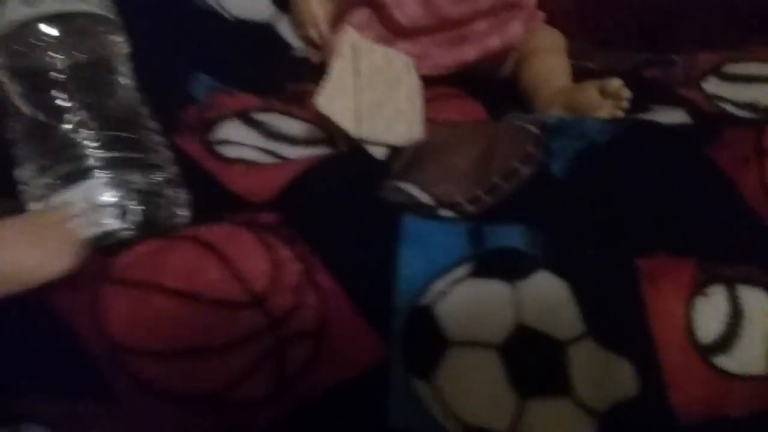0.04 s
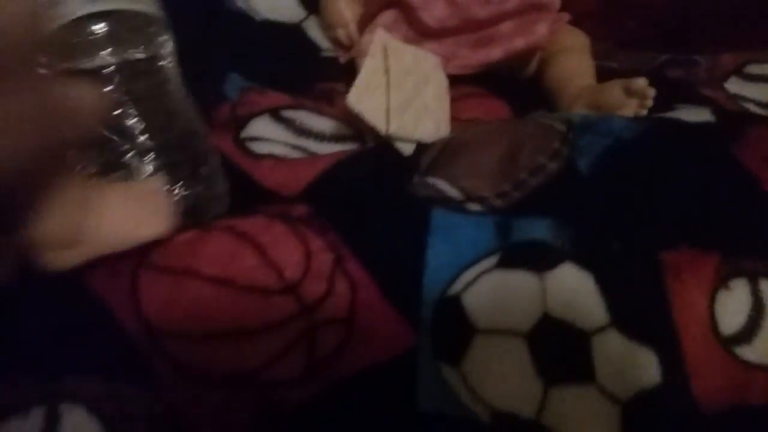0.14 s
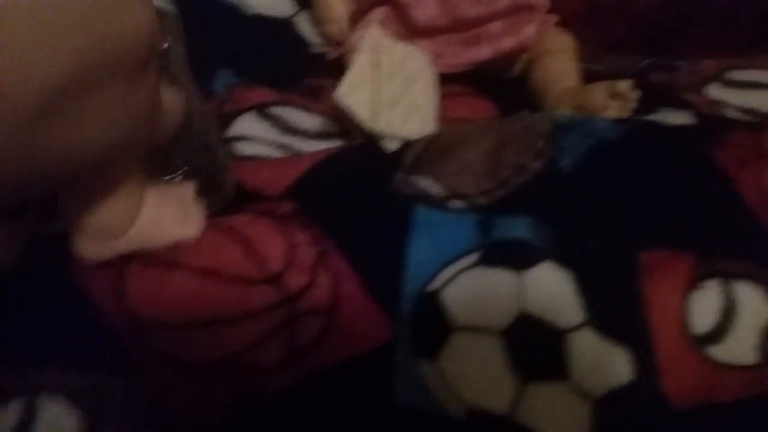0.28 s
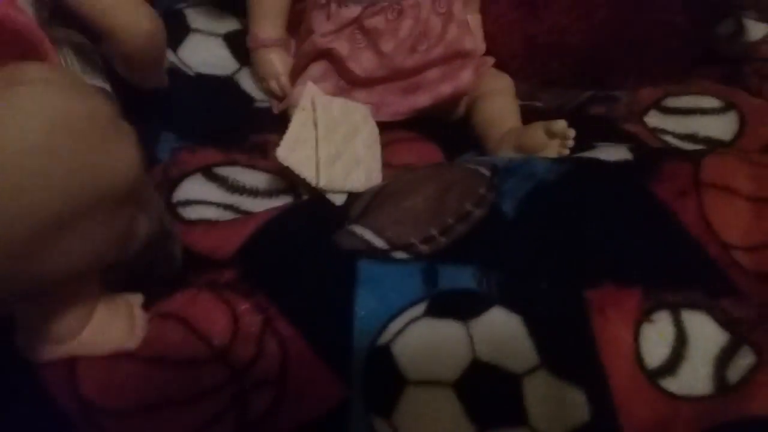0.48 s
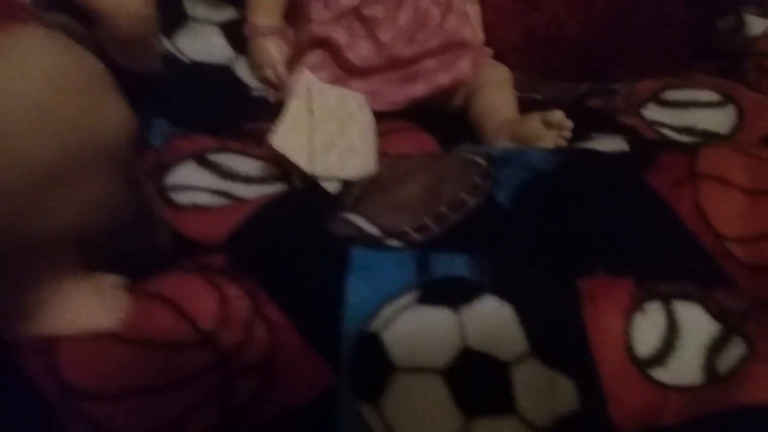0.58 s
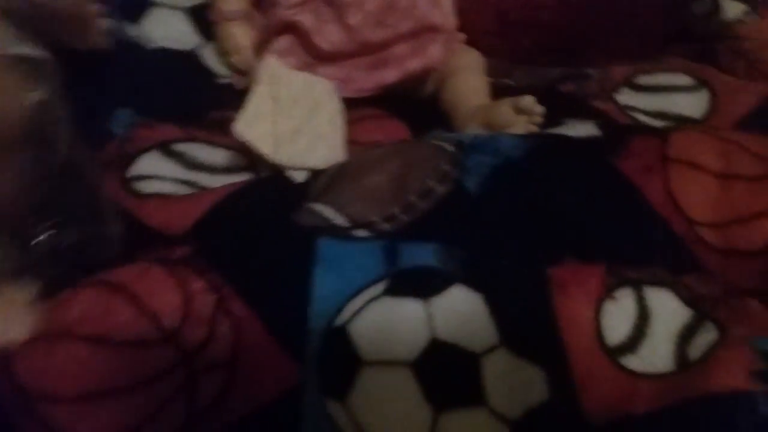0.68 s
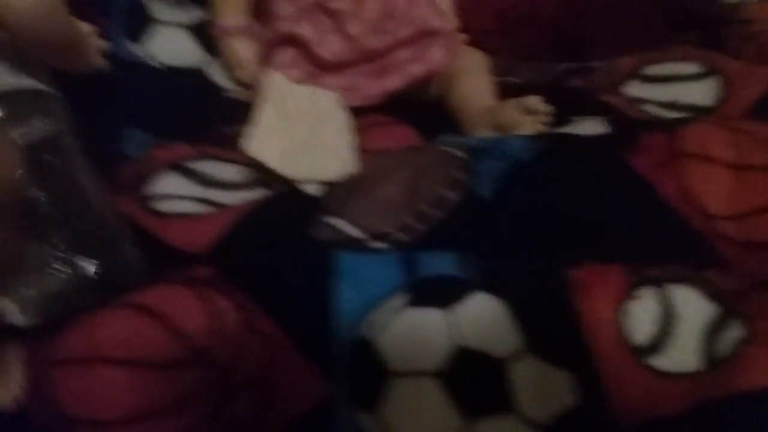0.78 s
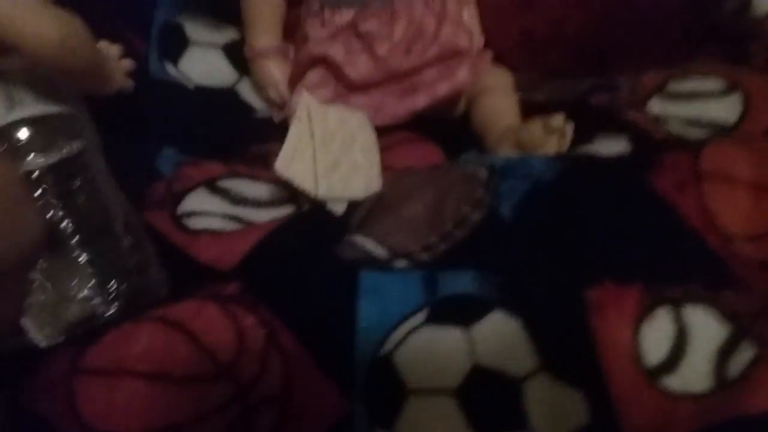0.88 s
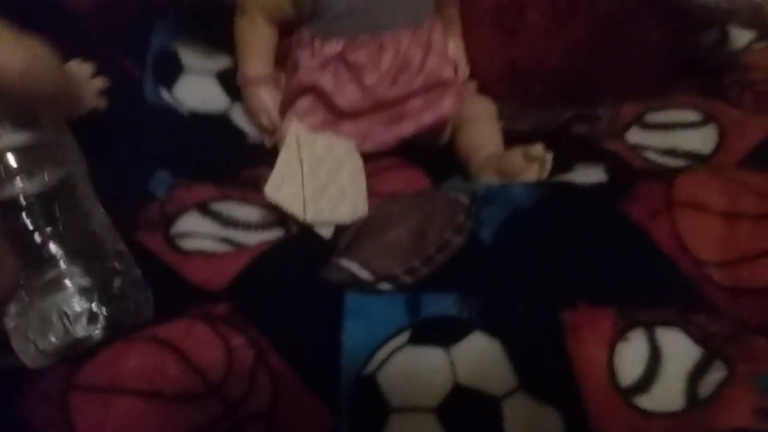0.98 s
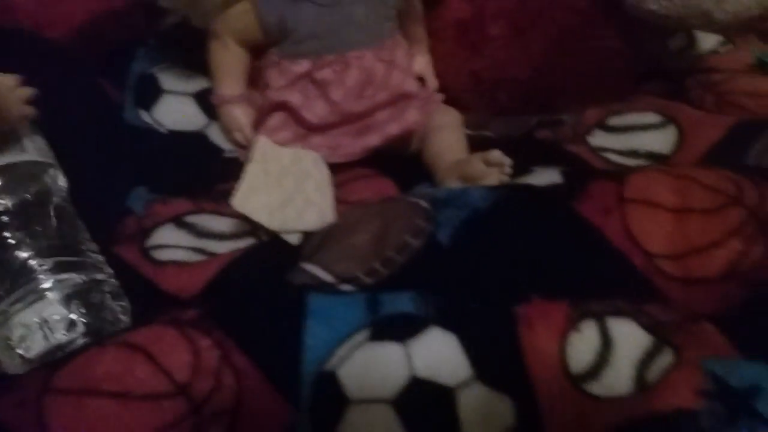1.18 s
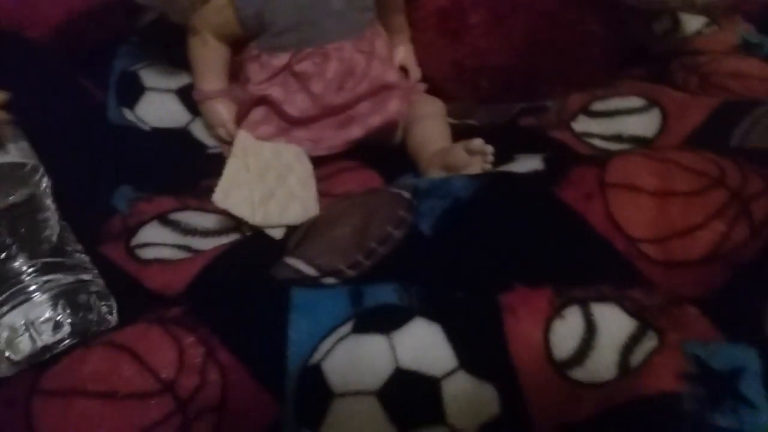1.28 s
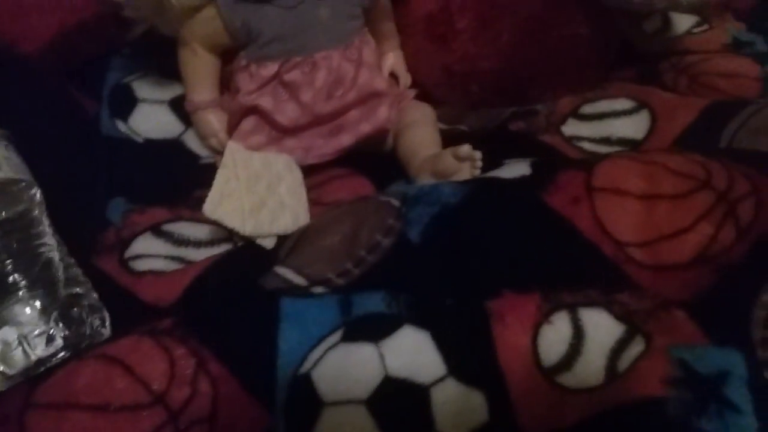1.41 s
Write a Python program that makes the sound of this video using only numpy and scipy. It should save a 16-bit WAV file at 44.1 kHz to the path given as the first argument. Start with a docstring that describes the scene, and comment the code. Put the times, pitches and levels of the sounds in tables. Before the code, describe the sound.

A thin plastic bottle is squeezed close to a phone microphone: faint brushing and small ticks, one loud snap, a short gap, then a tight burst of loud crackles, fading into quiet rumble in a small soft room.

```python
"""Squeezed plastic bottle

A thin plastic water bottle is squeezed close to a phone in a small soft room.
Dents snap over: runs of tiny random cracks ring damped wall modes, with a bright tick on top.
Each snap feeds a noise tail with early echoes; decaying sines make dull knocks.
Shaped noise makes the hand's brushing, the handling rumble and the faint room air."""
import sys
import numpy as np
from scipy import signal
from scipy.fft import rfft, irfft
from scipy.io import wavfile
from scipy.ndimage import uniform_filter1d

SR = 44100
rng = np.random.default_rng(int(sys.argv[2]) if len(sys.argv) > 2 else 0)


def wrap_up_sound(samples):
    """Save the sound to the file named by the first command line argument, as 16-bit audio."""
    columns = np.atleast_2d(samples).T
    # keep every value between -1 and 1, then stretch to whole-number steps
    tamed = np.clip(columns, -1, 1)
    steps = np.round(tamed * 32767).astype(np.int16)
    wavfile.write(sys.argv[1], SR, steps)


def ratio(d):
    """dB to gain"""
    e = np.asarray(d, float) / 20
    return 10 ** e


N = 63945

# hand brushing the plastic, before its flutter [t/s, level/dB]
BRUSH_LEVEL = [(0, -57.5), (.045, -56.5), (.1, -64.5), (.125, -52.5), (.15, -67), (.2, -84), (.23, -73.5),
               (.65, -94.5), (.72, -104.5), (.76, -77.5), (.8, -101.5), (.95, -70.5), (1.04, -68.5),
               (1.1, -63.5), (1.115, -76.5), (1.3, -78.5), (1.45, -72.5)]
# relative spectrum of the first brushing [f/Hz, level/dB]
BRUSH_COLOUR = [(880, -36.5), (1500, -3), (1930, -18.5), (2080, -12.5), (2920, -2), (3890, -20.5),
                (5470, 4.5), (6780, -2.5), (7700, -21), (10000, -25), (13000, -44.5), (22000, -120)]
# relative spectrum of the later, lighter brushing [f/Hz, level/dB]
SLIDE_COLOUR = [(880, -36), (1500, -13), (1980, -4), (3740, -9.5), (4740, -0.5), (6410, -12), (8460, -20.5),
                (10000, -21), (13000, -51.5), (22000, -120)]
# handling rumble, before swell and flutter [t/s, level/dB]
RUMBLE_LEVEL = [(0, -68.5), (.045, -59), (.1, -65), (.125, -56), (.15, -63.5), (.18, -61.5), (.225, -59),
                (.255, -52), (.285, -67), (.335, -60), (.43, -56), (.56, -58), (.65, -68.5), (.69, -56.5),
                (.72, -62), (1.45, -62)]
# relative spectrum of the rumble [f/Hz, level/dB]
RUMBLE_COLOUR = [(12, -47), (20, -15), (27, -19.5), (53, -9.5), (86, 0), (130, -2.5), (161, -6.5),
                 (229, -4.5), (700, -21.5), (910, -49.5), (1540, -120)]
# relative spectrum of the room air [f/Hz, level/dB]
AIR_COLOUR = [(180, -31), (300, -5), (441, -9.5), (587, -5), (638, -2.5), (3770, -20.5), (4770, -22.5),
              (6560, -21), (15200, -24), (16500, -48.5)]
# shared swells and brief dips of rumble and air [t/s, level/dB]
BACKGROUND_SWELL = [(0, 7.5), (.09, 7.5), (.105, 3), (.13, 5), (.2, 8.5), (.235, -9), (.3, 6.5), (.6, 4.5),
                    (.7, 3), (.725, -13), (.74, 3.5), (.78, -1), (.822, -8), (.832, 1.5), (.89, -2),
                    (.94, 2), (1.1, 0.5), (1.13, -2.5), (1.16, 3), (1.182, -8.5), (1.195, 2.5),
                    (1.225, 3.5), (1.247, -12), (1.258, 3.5), (1.272, 3), (1.29, 3), (1.33, -1), (1.41, 5),
                    (1.45, 1.5)]
# snaps of dents, loud and faint; modes and tick are set against the high modes
# [t/s, peak level/dB, low modes level/dB, middle modes level/dB, tick level/dB, run length/ms]
SNAPS = [(.0760, -43.5, 7.5, -10.5, -35, 1.5), (.1262, -37.5, 5, -5.5, -18, .4),
         (.1530, -40, -10, -5, -20.5, 1.2), (.1590, -46.5, 2.5, 0.5, -30, 1.0),
         (.1702, -25, -6.5, -10.5, -24.5, 1.6), (.2105, -44.5, 6, 2.5, -32, 2.5),
         (.2265, -52, 3.5, 0, -27.5, 1.2), (.2419, 3, -16.5, -1.5, -12, 1.6),
         (.3730, -4, -2.5, -13, -27.5, 1.2), (.4038, -17, 1, -3, -31.5, .8),
         (.4094, -1, -9, -12.5, -25.5, 1.3), (.4288, -8, 1.5, -7, -35.5, 1.0),
         (.4347, -8, 3.5, -7, -33.5, .5), (.4589, 2, -4, -3.5, -21, 1.6), (.4787, -9, -6.5, -10.5, -29, .8),
         (.6490, -67, -34, -8, -28, 0.59), (.6788, -43, 10, 12, -32, 1.6),
         (.7318, -31, 3.5, -13, -23.5, 0.37), (.7440, -60, 12, 0, -32, 1.2), (.7545, -49, 5, -4, -29, 0.43)]
# families of wall modes, before each dent's scatter [f/Hz, level/dB]
LOW_MODES = [(1100, -20), (1550, -20), (2050, -13), (2580, 0), (2900, -5)]
MIDDLE_MODES = [(3250, -3), (3550, 0), (4350, 0)]
HIGH_MODES = [(4700, -9.5), (5100, 12.5), (5500, 2.5), (6300, -19), (7000, -15.5), (7700, -15.5),
              (8700, -24.5)]
# tail of the small room [f/Hz, level/dB, t60/s]
ROOM_TAIL = [(200, -28, 0.38), (612, -16.5, 0.16), (1200, -13.5, 0.37), (2000, -12.5, .3), (2673, -9, 0.77),
             (4046, -9.5, .3), (4500, -2, 0.39), (5200, 1, .32), (6200, -10.5, .3), (7446, -8, 0.49),
             (8120, -14.5, .27), (8900, -19, 0.091), (12120, -23, 0.084), (16000, -31, .2)]
# wall echoes; each peaks ECHO_S after its listed time [t/s, level over the tail/dB]
ECHOES = [(.0101, 6), (.0140, 4), (.0175, 3), (.0225, 2)]
# soft knocks on the bottle's body [t/s, level/dB, f/Hz, t60/s]
KNOCKS = [(.1263, -33, 450, .014), (.429, -37, 200, .06), (.429, -33, 950, .015), (.435, -33, 850, .015),
          (.410, -31, 1050, .015), (.459, -40, 300, .04), (.679, -48, 200, .03)]

SLIDE_FROM_S = 0.47  # the later brushing takes over
AIR_DB = -67.5  # before swell and flutter
RING_T60_S, RISE_S = .0055, .0003  # decay and build-up of a wall mode
MODE_SCATTER_DB, MODE_SCATTER_HZ_SHARE = 1.5, .015  # spread from dent to dent
CREAK_DB, CREAK_MS = -16.5, 4.4  # weaker cracks trailing each snap
THIN_HZ, DULL_HZ, CRACK_HZ = 1300, 8640, 11570  # edges of the snap's band; pitch of its tick
ROOM_DB, ROOM_START_S, ECHO_S = -15, .011, 0.00079  # tail before its shaping, its onset, echo width
LOW_CUT_HZ, TOP_HZ, CLIP = 45, 16000, .9  # the phone's range and the ceiling of its peaks


def curve(rows):
    """Straight lines through (s, value) rows."""
    rows = np.array(rows, float)
    return np.interp(np.arange(N) / SR, rows[:, 0], rows[:, 1])


def shape(rows, hz, col=1):
    """A spectrum column read on a log-frequency axis."""
    rows = np.array(rows, float)
    return np.interp(np.log(hz + 1), np.log(rows[:, 0]), rows[:, col])


def noise(colour):
    """Noise of a colour, rms 1."""
    hz = np.arange(N // 2 + 1) * SR / N
    x = irfft(rfft(rng.standard_normal(N)) * ratio(shape(colour, hz)), N)
    return x / np.std(x)


def walk(rate):
    """Random levels held 1 / rate s, then smoothed; spread 1."""
    hold = int(SR / rate)
    steps = np.repeat(rng.standard_normal(N // hold + 1), hold)
    x = uniform_filter1d(uniform_filter1d(steps, hold), hold)[:N]
    return x / np.std(x)


def add(out, s, x):
    """Mix x in from time s."""
    i = int(s * SR)
    out[i:i + len(x)] += x[:N - i]


def unit(x):
    """Energy 1 along time."""
    return x / np.sqrt(np.sum(x ** 2, axis=-1, keepdims=True))


def brush():
    """A hand rubs the plastic: fluttering noise that changes colour once."""
    early = np.arange(N) < SLIDE_FROM_S * SR
    rub = np.where(early, noise(BRUSH_COLOUR), noise(SLIDE_COLOUR))
    return rub * ratio(curve(BRUSH_LEVEL) + 2.2 * walk(150))


def rumble(flutter):
    """Handling rumble: mostly low noise that swells and flutters."""
    level = curve(RUMBLE_LEVEL) + curve(BACKGROUND_SWELL) + 1.5 * flutter
    return noise(RUMBLE_COLOUR) * ratio(level)


def air(flutter):
    """Faint room air: shaped noise under the same swell and flutter as the rumble."""
    return noise(AIR_COLOUR) * ratio(AIR_DB + curve(BACKGROUND_SWELL) + 0.98 * flutter)


def wall(modes, push):
    """Quickly damped modes, a little different at each dent, each rung by its own cracks."""
    hz, db = np.array(modes, float).T[:, :, None]
    db_scatter, hz_scatter = rng.standard_normal((2, len(modes), 1))
    hz = hz * (1 + MODE_SCATTER_HZ_SHARE * hz_scatter)
    t = np.arange(512) / SR
    envelope = (1 - np.exp(-t / RISE_S)) * np.exp(-np.log(1000) * t / RING_T60_S)
    ring = envelope * np.sin(2 * np.pi * hz * t)
    cracks = push * rng.standard_normal((len(modes), len(push)))
    rung = unit(signal.fftconvolve(cracks, ring, axes=1))
    return unit((ratio(db + MODE_SCATTER_DB * db_scatter) * rung).sum(0))


def snaps(rows):
    """A crack run with a weaker trail rings the wall and ticks; second row: drive for the room."""
    out, t = np.zeros((2, N)), np.arange(1024) / SR
    body = signal.butter(2, [THIN_HZ, DULL_HZ], "band", fs=SR, output="sos")
    tick_band = signal.butter(2, [CRACK_HZ * .72, CRACK_HZ * 1.2], "band", fs=SR, output="sos")
    for s, db, low_db, mid_db, tick_db, ms in rows:
        u = t * 1000 / max(ms, .1)  # time in run lengths
        run = u ** .3 * np.exp(-u ** 3)
        creak = ratio(CREAK_DB) * np.minimum(u, 1) * np.exp(-t * 1000 / CREAK_MS)
        push = run + creak
        ringing = wall(HIGH_MODES, push)
        ringing = ringing + ratio(low_db) * wall(LOW_MODES, push)
        ringing = ringing + ratio(mid_db) * wall(MIDDLE_MODES, push)
        snap = signal.sosfilt(body, ringing)
        tick = unit(signal.sosfilt(tick_band, run * rng.standard_normal(1024)))
        snap[:1024] += ratio(tick_db) * tick
        snap = snap * ratio(db) / np.abs(snap).max()
        add(out[0], s, snap)
        out[1, int(s * SR)] = np.sqrt(np.sum(snap ** 2))  # one impulse of the snap's energy
    return out


def room(sent):
    """A dense tail dies band by band, with a few wall echoes standing out at its start."""
    t = np.arange(SR // 2) / SR
    f = np.fft.rfftfreq(len(t), 1 / SR)
    hiss = rfft(rng.standard_normal(len(t))) * ratio(shape(ROOM_TAIL, f))
    tail = np.zeros(len(t))
    for hz in 150 * 2 ** np.arange(0, 7, .5):  # half-octave bands
        band = irfft(hiss * np.exp(-(np.log2((f + 1) / hz) / .4) ** 2), len(t))
        tail += band * np.exp(-np.log(1000) * t / shape(ROOM_TAIL, hz, col=2))
    rise = np.clip((t - ROOM_START_S) / .004, 0, 1)
    echoes = sum(ratio(db) * np.exp(-((t - s - ECHO_S) / ECHO_S) ** 2) for s, db in ECHOES)
    response = ratio(ROOM_DB) * unit(tail) * (rise + echoes)
    return signal.fftconvolve(sent, response)[:N]


def knocks():
    """Dull pushes on the full body of the bottle: decaying sines."""
    out, t = np.zeros(N), np.arange(8192) / SR
    for s, db, hz, t60 in KNOCKS:
        decay = np.exp(-np.log(1000) * t / t60)
        add(out, s, ratio(db) * np.sin(2 * np.pi * hz * t) * decay)
    return out


def scene():
    """Bottle with its room, hand, rumble and air."""
    flutter = walk(70)  # shared by rumble and air
    background = brush() + rumble(flutter) + air(flutter)
    near, sent = snaps(SNAPS)
    return (background + near + room(sent) + knocks())[None]


def band_limit(x):
    """A steep low-pass at the top of the band."""
    return signal.sosfilt(signal.butter(12, 16820, fs=SR, output="sos"), x)


def record(dry):
    """The phone cuts both ends of the range and rounds the sharpest peaks."""
    band = signal.butter(3, [LOW_CUT_HZ, TOP_HZ], "band", fs=SR, output="sos")
    x = signal.sosfilt(band, dry)
    mix = x / (1 + np.abs(x / CLIP) ** 10) ** (1 / 10)
    return band_limit(mix)


dry = scene()
out = record(dry)
wrap_up_sound(out)
```